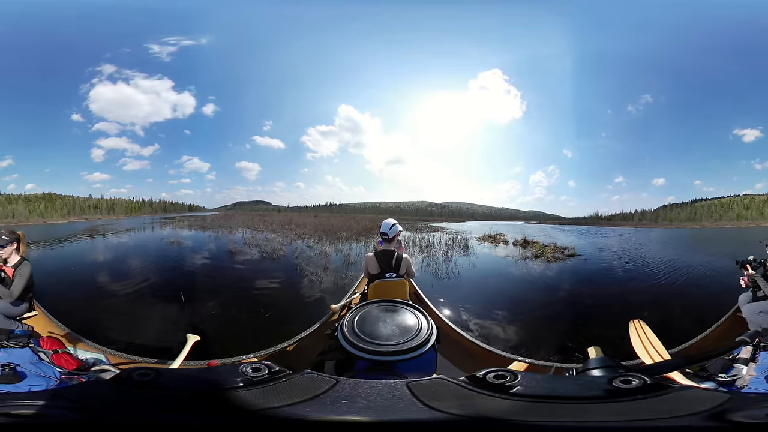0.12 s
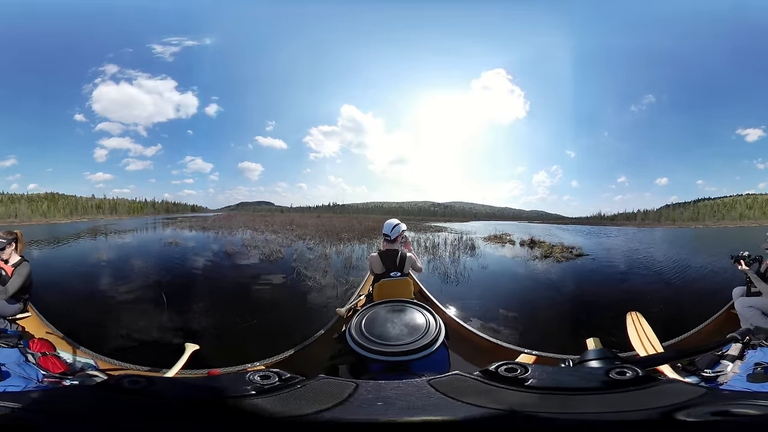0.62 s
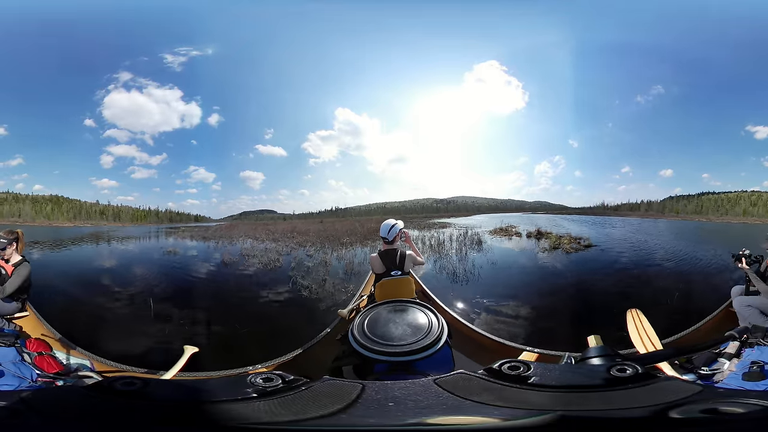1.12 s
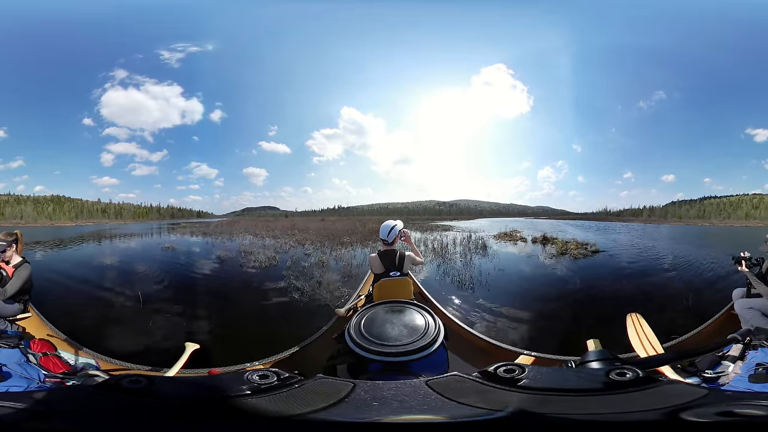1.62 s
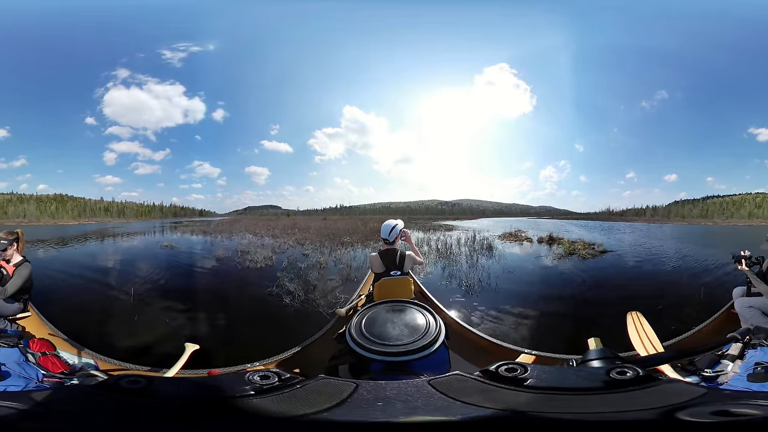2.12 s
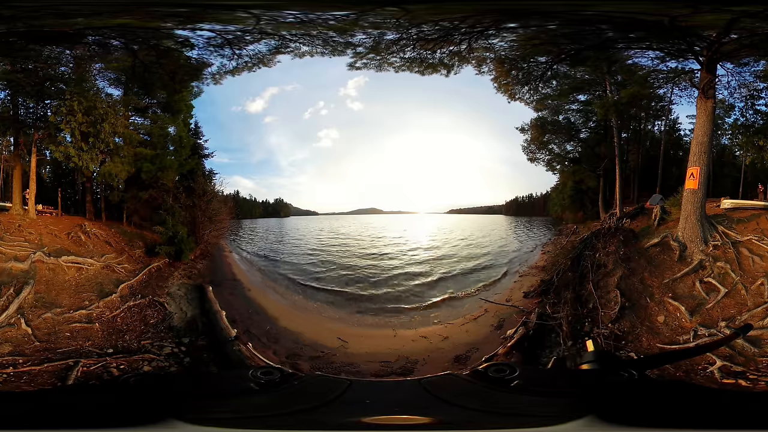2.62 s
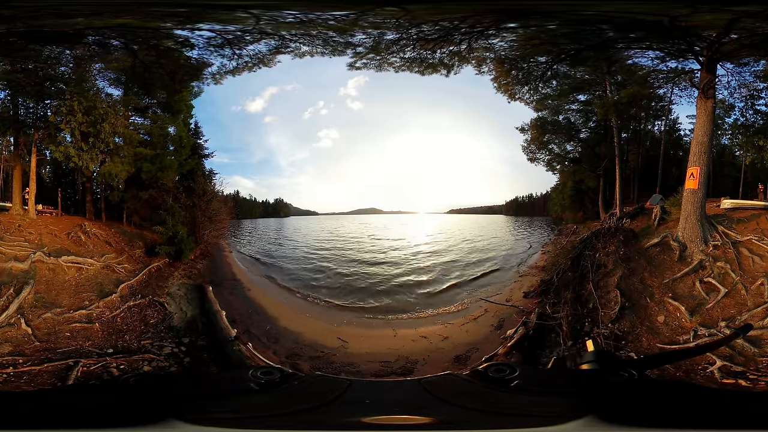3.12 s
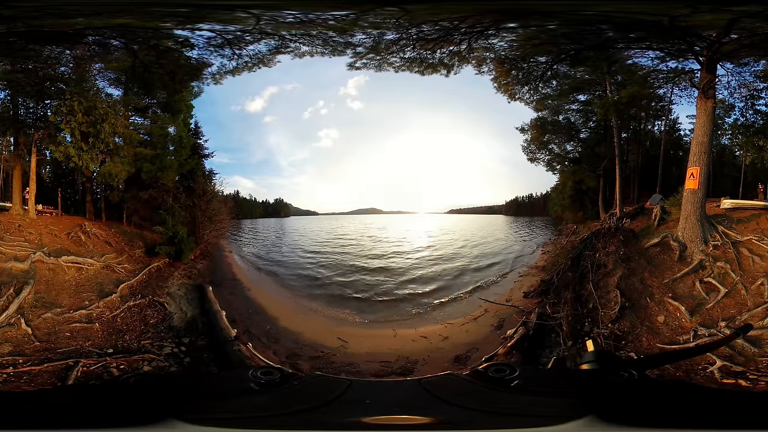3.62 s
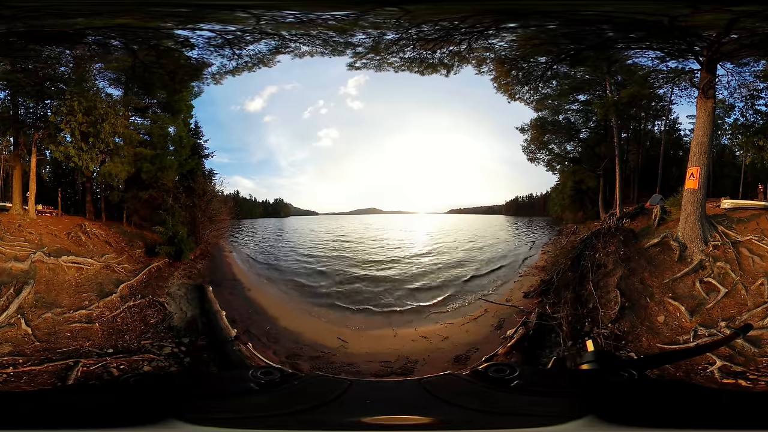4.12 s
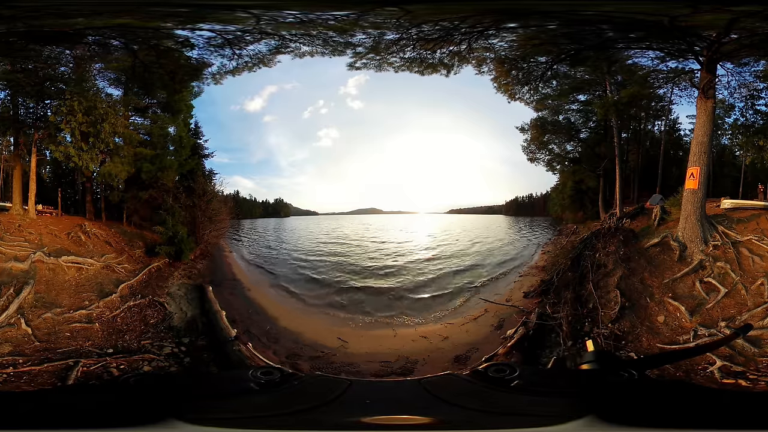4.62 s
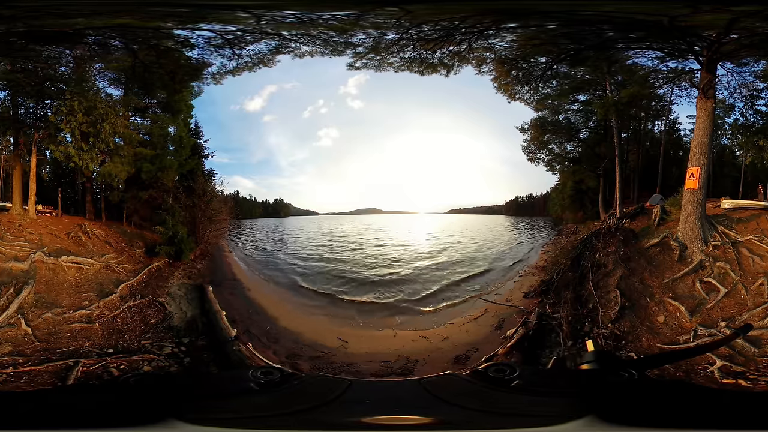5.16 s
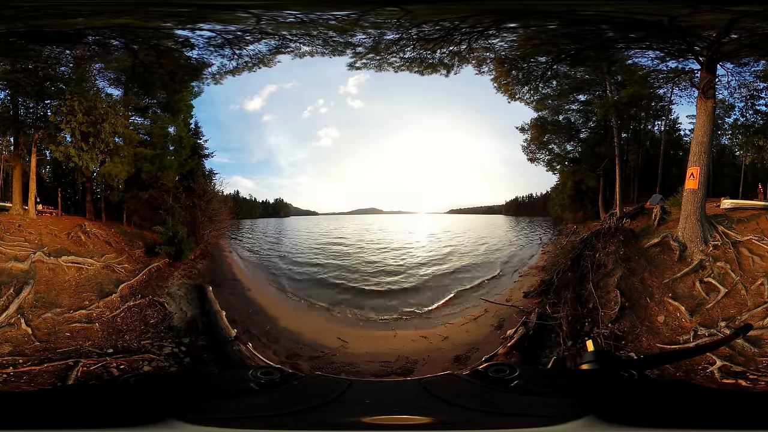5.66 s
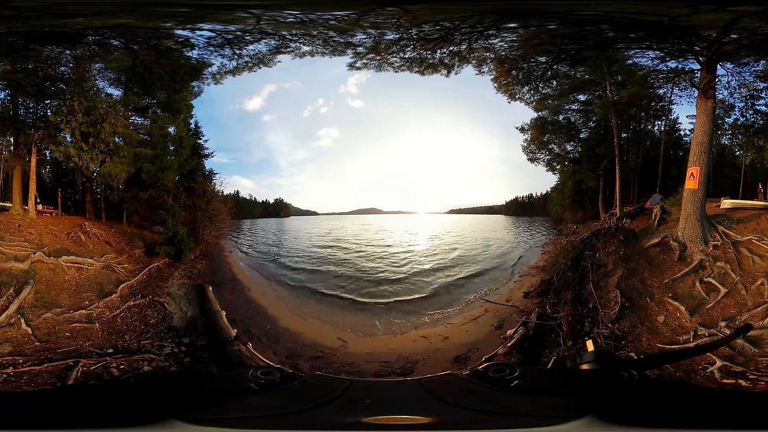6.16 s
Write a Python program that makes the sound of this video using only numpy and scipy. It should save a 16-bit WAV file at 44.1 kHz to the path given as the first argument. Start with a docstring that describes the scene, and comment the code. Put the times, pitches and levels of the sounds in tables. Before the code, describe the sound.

Lumpy wind buffets the microphone with dull thuds over faint rippling water, then abruptly small waves lap, gurgle and fizz on a sandy shore.

```python
"""First a boat on open water: gusts buffet each of two microphone ports as lumpy low noise with single dull thuds,
the lake rustles and swishes in flickering noise bands, and gear ticks on the hull as struck modes.
Then the place changes at once to a shore: wavelets fold to left and right, trapped bubbles sing as gliding decaying
sines, foam fizzes in tiny ringing pops and short snaps, crests slap, and the wash swells and drains as coloured noise."""
import sys
import numpy as np
from scipy import signal
from scipy.fft import rfft, irfft, next_fast_len
from scipy.io import wavfile

SR = 44100
rng = np.random.default_rng(int(sys.argv[2]) if len(sys.argv) > 2 else 0)


def ratio_of_db(decibels):
    """Turn decibels (scalar or array-like) into linear amplitude factors; 0 dB maps to 1."""
    return 10 ** (np.asarray(decibels, float) / 20)


def store_wav(level_fs):
    """Save 16-bit WAV to argv[1]."""
    pcm = np.round(np.clip(np.atleast_2d(level_fs), -1, 1) * 32767)
    wavfile.write(sys.argv[1], SR, pcm.T.astype(np.int16))


N = 276507

CHANGE_S = 2.4907   # boat before, shore after
PORT_LAG_MS = 0.21   # the farther port hears this much later
# where along the beach the water folds: (time [s], lag of the left port [ms])
FOLDING_SIDE = [(2.5, .04), (2.62, -0.1), (2.9, -.15), (3.05, 0.033), (3.3, 0.057), (3.45, -0.13),
                (4.2, -0.23), (4.4, 0.056), (4.6, -0.28), (4.87, -0.083), (4.96, 0.23), (5.25, 0.15),
                (5.5, -0.014), (5.8, -0.034), (6.05, -0.12), (6.27, -0.029)]


def in_time(rows):
    """Linear interpolation: the columns of a time table, sample by sample."""
    s, *columns = np.transpose(rows)
    return [np.interp(np.arange(N) / SR, s, c) for c in columns]


def at_hz(points, hz):
    """Pitch is logarithmic: a table is read on a log-frequency axis."""
    return np.interp(np.log(hz), np.log(np.array(points)[:, 0]), np.array(points)[:, 1])


def rms_one(x):
    """Normalisation to unit mean power."""
    return x / np.sqrt(np.mean(x ** 2) + 1e-20)


def band(x, low_hz, high_hz):
    """Butterworth band-pass: flat within the band."""
    sos = signal.butter(2, [low_hz, min(high_hz, .45 * SR)], "band", fs=SR, output="sos")
    return signal.sosfilt(sos, x)


def split(x, centres):
    """Zero-phase filter bank: overlapping triangles in log frequency that add up to one."""
    size = next_fast_len(x.shape[-1])
    spectrum = rfft(x, size)
    log_hz = np.log(np.arange(size // 2 + 1) * SR / size + 1e-3)
    for k in range(len(centres)):
        weight = np.interp(log_hz, np.log(centres), np.arange(len(centres)) == k)
        yield irfft(spectrum * weight, size)[..., :x.shape[-1]]


def drift(rate_hz):
    """Low-passed noise of rms 1: a double pole lets through changes up to about rate_hz."""
    r = np.exp(-80 * np.pi * rate_hz / SR)   # one value per 40 samples
    slow = signal.lfilter([1], [1, -2 * r, r * r], rng.standard_normal(N // 40 + 2002))[2000:]
    return np.interp(np.arange(N) / 40, np.arange(len(slow)), rms_one(slow))


def grains(per_s, spread_db):
    """Poisson-like impulses of either sign with a long tail of sizes."""
    sizes = ratio_of_db(spread_db * np.minimum(rng.exponential(1, N), 5)) * rng.choice([-1, 1], N)
    return sizes * (rng.random(N) < per_s / SR) + 1e-18


def ring(clicks, hz, t60_s):
    """Damped resonator: a unit click sets off a sine that falls 60 dB in t60_s."""
    r, w = ratio_of_db(-60 / (t60_s * SR)), 2 * np.pi * hz / SR
    return signal.lfilter([0, np.sin(w)], [1, -2 * r * np.cos(w), r * r], clicks + 1e-18)


def add(out, s, burst, peak_db, pan_db):
    """Arrival-time and level differences: a short burst reaches the nearer port first and stronger."""
    burst = burst / abs(burst).max() * ratio_of_db(peak_db + np.array([[.5], [-.5]]) * pan_db)
    for side in (0, 1):
        farther = (pan_db < 0) != side
        i = round(s * SR + farther * PORT_LAG_MS * SR / 1000)
        out[side, i:i + 240] += burst[side, :max(N - i, 0)]


def wind(sign):
    """Turbulent pressure pushes a port membrane in lumps; sign is 1 for the left port, -1 for the right."""
    # gust: (time [s], drive, 6 dB below the summed power of both ports [dB], left re right [dB],
    # flutter drive, scaled by flutter_share [dB])
    gust = [(0.0, -43, -13, -12.5), (0.31, -28, -6, -16), (0.39, -35.5, -24, -11), (0.47, -33.5, -9, -8),
            (0.6, -28, -20, -14.5), (0.67, -38, -9.5, -10), (0.93, -31, -8, -13), (0.98, -28, -3, -17),
            (1.09, -34.5, -9.5, -9.5), (1.19, -36.5, 11.5, -10.5), (1.23, -29, -16, -12),
            (1.39, -19.5, 10, -23), (1.41, -29.5, -1.5, -13.5), (1.84, -37, 14, -16), (1.95, -34, 0, -19.5),
            (2.2, -35.5, 11.5, -9.5), (2.24, -36.5, -1.5, -10), (2.49, -38, 5.5, -5)]
    # eddy spectrum: (frequency [Hz], relative density [dB per Hz])
    eddy = [(20, 4), (40, 1.5), (90, -2), (160, 0), (300, -10.5), (600, -34), (1200, -55.5)]
    # (frequency [Hz], share of the lump dB [ratio])
    lump_share = [(30, -0.67), (100, 1.3), (300, 1.2), (700, 0.7)]
    # (frequency [Hz], share of the flutter dB [ratio])
    flutter_share = [(100, 1), (170, 2.1), (300, 2.5), (700, 2.7)]
    # single strong eddies: (time [s], peak at the louder port [dB], left re right [dB], top frequency [Hz])
    thumps = [(0.317, -22, -29, 267), (0.367, -11, -46, 269), (0.482, -9.5, -43, 253),
              (0.505, -20, -39, 274), (0.522, -14, -39, 261), (0.545, -22, -35, 236),
              (0.572, -21, -30.5, 236), (0.6, -22.5, -22, 196), (0.764, -25.5, -28, 254),
              (0.81, -22.5, -15, 190), (0.852, -29.5, -16, 198), (0.906, -24.5, -20, 260),
              (0.953, -18.5, -2, 99), (1.01, -23.5, 11, 90), (1.231, -18, -11, 170), (1.255, -20, -16, 275),
              (1.268, -17.5, -9, 119), (1.318, -15, -6, 149), (1.342, -22, 28, 295), (1.404, -26, -6, 177),
              (1.445, -26, -17, 276), (1.549, -22.5, 26, 270), (1.894, -36.5, 1, 195),
              (2.115, -29, 23, 275), (2.293, -33, 6, 218), (2.42, -26, -3, 238)]
    decay_cycles, rise_cycles = 1.67, 1.23   # of the top frequency

    cut = round(CHANGE_S * SR)
    rumble_db, pan_db, flutter_db = in_time(gust)
    lumps_db = 2.34 * drift(31.4)[:cut]
    pushes = rms_one(rng.standard_normal(N) + grains(300, spread_db=4.0) * 5.6)[:cut]
    centres, out = 16 * 2 ** np.arange(0, 6.6, .5), np.zeros(N)
    for hz, part in list(zip(centres, split(pushes, centres)))[1:-1]:
        flutter = at_hz(flutter_share, hz) * flutter_db[:cut]
        lumps = at_hz(lump_share, hz) * lumps_db
        out[:cut] += part * ratio_of_db(at_hz(eddy, hz) + flutter + lumps)
    out[:cut] = rms_one(out[:cut])
    out *= ratio_of_db(rumble_db) * 2 / np.sqrt(1 + ratio_of_db(-2 * sign * pan_db))

    steps = np.arange(3000)
    for s, peak_db, pan_db, top_hz in thumps:
        u = steps / SR * top_hz   # a slower eddy lasts longer
        noise = rng.standard_normal(6000)
        for order in (2, 3):   # steep above the top, so an eddy is a dull thud
            low_pass = signal.butter(order, top_hz * (order - 1), fs=SR, output="sos")
            noise = signal.sosfilt(low_pass, noise)
        rise = np.sin(np.minimum(u / rise_cycles, 1) * np.pi / 2) ** 2
        thud = band(noise, 38, 1900)[3000:] * np.exp(-u / decay_cycles) * rise
        i = round(s * SR)
        out[i:i + 3000] += thud / abs(thud).max() * ratio_of_db(peak_db + min(sign * pan_db, 0))
    return out


def sing(rows):
    """Bubble resonance: a fast swell, a pitch glide and a decay, reaching one port a little before the other."""
    s, peak_db, first_hz, last_hz, length_ms, lag_ms = np.transpose(rows)[..., None]
    out = np.zeros((2, N + 4000))
    steps = np.arange(min(int(length_ms.max() * SR / 350), 3000))
    length = np.clip(length_ms, .3, 40) / 1000
    start = np.clip(np.round((s - .5 * length) * SR), 0, N).astype(int)
    phase = rng.uniform(0, 2 * np.pi, s.shape)
    for side, sign in enumerate((1, -1)):
        t = np.maximum(steps / SR - (0.24 + sign * lag_ms / 2) / 1000, 0)
        u = t / length
        shape = np.tanh(5.9 * u) * np.exp(.3 - 1.22 * u ** 0.91)
        turns = first_hz * t + (last_hz - first_hz) * t * u / 2.03
        np.add.at(out[side], start + steps, ratio_of_db(peak_db) * shape * np.sin(2 * np.pi * turns + phase))
    # high-pass at 170 Hz: keeps the abrupt bubble onsets from thumping in the bass
    return band(out[:, :N], 170, 16000)


def with_offspring(rows, count=3):
    """Fragmentation: a big bubble breaks up, and smaller, mostly higher and weaker ones follow it."""
    young = np.repeat(np.array(rows, float), count, axis=0)
    normal = rng.standard_normal((len(young), 3))
    young[:, 0] += young[:, 4] / 1000 * (0.2005 + 0.78 * abs(normal[:, 0]))
    young[:, 1] += -12.0 + 2 * normal[:, 1]
    young[:, 2:4] *= 2 ** (0.33 + 0.397 * normal[:, 2:])
    young[:, 4] *= .45
    return np.vstack([rows, young])


def big_bubbles():
    """Localisation by delay: the clear bubbles and their offspring come from where the water folds."""
    # (time half a length after onset [s], strength before the envelope [dB], first pitch [Hz],
    # last pitch [Hz], length [ms])
    clear_bubbles = [(2.516, -46.5, 1910, 1640, 3.2), (2.6, -39, 340, 472, 16.4),
                     (2.619, -33.5, 546, 610, 12.4), (2.635, -37, 880, 990, 8), (2.689, -42, 1080, 1130, 8),
                     (2.804, -42, 636, 715, 8.3), (2.874, -39, 2100, 2130, 4), (2.973, -39, 724, 860, 10),
                     (2.98, -35, 377, 401.5, 36), (3.005, -46, 1110, 1230, 20),
                     (3.195, -40, 2060, 2100, 4.1), (3.28, -40, 660, 550, 12), (3.438, -45, 206, 244, 34),
                     (3.47, -44.5, 247, 306, 27), (3.521, -44, 447, 581, 62), (3.587, -40, 400, 443, 40),
                     (3.591, -47, 191, 212, 27), (3.61, -31, 742, 723, 19.3), (3.715, -33, 1460, 1360, 3.4),
                     (3.742, -39, 1500, 1410, 4), (3.939, -37, 1570, 1780, 4.2),
                     (4.125, -46.5, 550, 750, 19), (4.207, -35, 1040, 1000, 4.3),
                     (4.247, -51, 334, 288, 23), (4.391, -40, 1020, 1120, 6.3), (4.399, -52, 370, 380, 23),
                     (4.419, -42, 584, 690, 13), (4.448, -45.5, 794, 890, 14.3), (4.633, -49, 275, 330, 30),
                     (4.617, -25.5, 1036, 900, 8.1), (4.642, -37, 930, 1190, 8), (4.669, -43, 340, 343, 22),
                     (4.741, -33, 2200, 2200, 2.4), (4.864, -40, 1700, 1800, 3.5),
                     (4.78, -45, 306, 235, 20.5), (4.961, -47, 532, 578, 23.5),
                     (4.975, -39.5, 1090, 1000, 8.8), (5.135, -41, 1510, 1410, 5.5),
                     (5.22, -40.5, 2380, 2360, 3), (5.352, -39.5, 865, 940, 15.3),
                     (5.384, -41.5, 339, 545, 34), (5.415, -42, 700, 750, 10.6),
                     (5.446, -39.5, 890, 950, 8), (5.684, -45, 597, 534, 16), (5.686, -44, 376, 348, 20),
                     (5.724, -39, 1040, 1210, 8), (5.738, -45, 246, 329, 28), (5.82, -42, 1260, 1330, 4.6),
                     (5.836, -39, 795, 980, 7.6), (5.873, -40.5, 1950, 1880, 11),
                     (5.875, -39, 1040, 1114, 9.9), (5.926, -45, 394, 438, 20), (5.982, -41, 427, 340, 18),
                     (6.043, -33.5, 1120, 1270, 11), (6.206, -44, 1250, 1600, 7.7),
                     (6.242, -42, 810, 995, 10)]
    rows = with_offspring(clear_bubbles)
    lag_ms = np.interp(rows[:, 0], *np.transpose(FOLDING_SIDE))
    return sing(np.column_stack([rows, lag_ms]))


def small_bubbles(gurgle_db, deep_db, count=3400):
    """Superposed resonances: crowds of lesser bubbles, thicker where a wavelet folds, from left or right."""
    draw, normal = rng.random((count, 3)), rng.standard_normal((count, 3))
    crowd = ratio_of_db(.5 * gurgle_db + 5.0 * drift(16.0)) * (np.arange(N) > CHANGE_S * SR)
    at = np.searchsorted(np.cumsum(crowd) / crowd.sum(), draw[:, 0]).clip(0, N - 1)
    hz = 950 * 2 ** (0.854 * normal[:, 0])
    level_db = np.where(hz < 650, deep_db[at] - 0.5, gurgle_db[at] - 2.0)
    high_loss_db = 5.2 * np.maximum(np.log2(hz / 1900), 0)
    low_loss_db = 6.0 * np.maximum(np.log2(330 / hz), 0)
    peak_db = level_db + 2.56 * normal[:, 1] - high_loss_db - low_loss_db
    cycles = np.minimum(2.546 + 8.84 * draw[:, 1] ** 2, hz / 60)
    # one patch of beach at a time
    side = np.sign(drift(11.0)[at] + 1.1 * (draw[:, 2] - .5) + 5.2 * in_time(FOLDING_SIDE)[0][at])
    lag_ms = PORT_LAG_MS * side + 0.075 * normal[:, 2]
    last_hz = hz * (1 + 0.15 * draw[:, 1])
    return sing(np.transpose([at / SR, peak_db, hz, last_hz, 1000 * cycles / hz, lag_ms]))


def spatter_db():
    """Shot noise with exponential decay: spray lands in sudden handfuls that lift the fizz and fade."""
    per_s, lift_db, fade_s = 9.0, 4.5, 0.024   # lift_db is the largest single lift
    r = np.exp(-1 / (fade_s * SR))
    handfuls = (rng.random(N) < per_s / SR) * rng.random(N)
    lifts = signal.lfilter([1], [1, -r], handfuls + 1e-18)
    return lift_db * (lifts - lifts.mean())


def fizz(fizz_db, count=90):
    """Impulsive film rupture: foam is a dense spray of ringing ticks; larger films snap as short noise bursts."""
    # the loudest films: (time [s], peak averaged in dB over the ports [dB], pitch [Hz], left re right [dB])
    loud_snaps = [(3.2485, -43, 11900, -7.0), (3.5475, -43, 6600, 5), (3.5934, -43, 5630, 17),
                  (3.6364, -32, 12100, -3.5), (4.2918, -45.5, 12100, -1.0), (4.509, -44, 11600, -11),
                  (4.852, -37.5, 10400, 8), (5.0307, -47, 5000, -13), (5.411, -46, 6750, -15),
                  (5.8273, -39, 6100, 1), (5.979, -36.5, 10700, 10), (6.156, -48, 11800, 15.5)]
    out = np.zeros((2, N))
    for hz in np.geomspace(2800, 12000, 6):
        pops = ring(grains(500, spread_db=2.6), hz, 6.0 / hz + .0006) * ratio_of_db(fizz_db - 6.0)
        lag = rng.integers(1, 9)   # samples
        out += np.array([pops, np.roll(pops, lag)])[::rng.choice([-1, 1])]
    draw = rng.random((count, 4))
    when = CHANGE_S + draw[:, 0] * (N / SR - CHANGE_S)
    level_db = fizz_db[(when * SR).astype(int)] + 18.5 - 21.0 * draw[:, 1]
    lesser = np.transpose([when, level_db, 3500 * 3.3 ** draw[:, 2], 27.0 * (draw[:, 3] - .5)])
    for s, peak_db, hz, pan_db in np.vstack([loud_snaps, lesser]):
        burst = rng.standard_normal(240) * np.exp(-np.arange(240) / 52.0)
        burst[0] = 1.04   # a sharp front, then spray
        add(out, s, band(burst, hz * 0.81, hz * 1.32), peak_db, pan_db)
    return out


def slaps():
    """Impact impulse: a crest hits flat, a single sharp pressure swing made by band-passing a click twice."""
    # (time [s], peak averaged in dB over the ports [dB], left re right [dB])
    crests = [(2.7155, -33, 4), (3.0685, -30, 0.), (3.1663, -25, 0.), (5.7, -33, -9), (5.932, -35, 8)]
    low_hz, high_hz = 550, 2400
    out = np.zeros((2, N))
    crack = band(band(np.arange(240) == 0, low_hz, high_hz), low_hz, high_hz)
    for s, peak_db, pan_db in crests:
        add(out, s, crack, peak_db, pan_db)
    return out


def ticks():
    """Modal excitation: gear knocks the hull with a rattling contact, each knock with its own mix of modes."""
    # (time [s], relative strength [dB])
    knocks = [(0.285, -44), (0.336, -47), (0.4526, -50), (0.477, -48.5), (1.165, -37)]
    # (frequency [Hz], relative strength [dB], 60 dB decay time [s])
    hull_modes = [(1800, -3, .012), (2300, -1, .012), (2900, -2, .006), (3600, -3, .004), (4600, -3, .004),
                  (5700, -2, .004), (6900, -4, .003), (8400, -4, .003), (11000, -5, .003)]
    out, at = 0, [round(s * SR) for s, db in knocks]
    for hz, level_db, t60_s in hull_modes:
        clicks = np.zeros(N)
        clicks[at] = ratio_of_db(np.array(knocks)[:, 1] + level_db - 11.0 + 2 * rng.standard_normal(len(at)))
        rattle = np.exp(-np.arange(300) / 103.0) * rng.standard_normal(300) * 0.49
        rattle[0] = 1
        out = out + ring(np.convolve(clicks, rattle)[:N], hz, t60_s)
    return band(out, 1350, 11000)


def hiss(colour, likeness, low_db, mid_db, treble_db, patchy_db, span):
    """Partly coherent stereo noise: bands flicker after their register's level, but bass keeps a mean level."""
    white = rng.standard_normal((2, N))[:, span]
    size = next_fast_len(white.shape[1])
    hz = np.arange(size // 2 + 1) * SR / size + 1
    mid, side = rfft(white, size) * ratio_of_db(at_hz(colour, hz))
    alike = np.clip(at_hz(likeness, hz), -.99, .99)
    pair = np.sqrt(1 + alike) * mid + np.sqrt(1 - alike) * side * [[1], [-1]]
    pair = irfft(pair, size)[:, :white.shape[1]]
    out, together = 0, drift(25)[span]
    centres = 120 * 2 ** np.arange(0, 7.1, .5)
    for centre, part in zip(centres, split(pair, centres)):
        register_db = (low_db if centre < 650 else mid_db if centre < 2600 else treble_db)[span]
        if centre < 200:
            register_db = np.mean(register_db)
        depth_db = patchy_db * min(1, 3000 / centre) ** .5
        flicker_db = depth_db * (0.72 * together + drift(23.6)[span])
        out = out + part * ratio_of_db(register_db + flicker_db)
    return out


def wash(gurgle_db, deep_db, fizz_db):
    """Coloured noise: the shore's wash swells and drains with the surge in three registers."""
    # (frequency [Hz], relative density [dB per Hz])
    shore_colour = [(20, -8), (60, -11.5), (140, -18), (210, -9.5), (260, -16), (450, -12), (900, -1),
                    (2000, -2.5), (2800, -11), (4000, -15.5), (7000, -19.5), (9000, -24.5), (12500, -24),
                    (13600, -31), (15700, -27)]
    # (frequency [Hz], left-right correlation [-1 to 1])
    shore_alike = [(60, 0.13), (110, 0.57), (200, 0.76), (380, 0.98), (700, 0.98), (1290, 0.66),
                   (2380, -0.6), (4400, -0.39), (8120, 0.23), (15000, -0.15)]
    span = slice(round(CHANGE_S * SR), N)
    return hiss(shore_colour, shore_alike, deep_db + 19.5, gurgle_db + 10.5, fizz_db + 22.0, 1.82, span)


def lake():
    """Coloured noise: ripples merge into a hiss that rustles early on and swishes near 2.3 s."""
    # (time [s], ripple hiss, relative [dB], treble, relative [dB])
    ripples = [(0.0, -63, -68.5), (0.1, -60.5, -66.5), (0.22, -64, -70.5), (0.32, -61, -66),
               (0.42, -63.5, -70), (0.5, -60.5, -67), (0.62, -64.5, -71), (1.0, -65, -72),
               (2.1, -63.5, -73), (2.24, -63, -70.5), (2.31, -55.5, -71.5), (2.48, -59.5, -70.5)]
    # (frequency [Hz], relative density [dB per Hz])
    lake_colour = [(300, -4.5), (500, -4.5), (900, -6), (1800, -8), (3600, -14.5), (9000, -20.5),
                   (12500, -22), (13600, -27), (15700, -23.5)]
    # (frequency [Hz], left-right correlation [-1 to 1])
    lake_alike = [(60, 0.05), (180, 0.34), (550, 0.95), (1650, 0.59), (4970, 0.12), (15000, -0.17)]
    ripple_db, treble_db = in_time(ripples)
    span = slice(0, round(CHANGE_S * SR))
    return hiss(lake_colour, lake_alike, ripple_db + 16.5, ripple_db + 18.0, treble_db + 23.5, 0.97, span)


def scene():
    """Superposition: the sources of each place add up, boat before the change and shore after it."""
    # wash swelling and draining: (time [s], gurgle, relative [dB], deep gurgle, relative [dB],
    # fizz, relative [dB])
    surge = [(2.49, -49, -49, -58), (2.64, -51, -52, -60), (2.8, -52.5, -55.5, -59.5),
             (2.95, -51.5, -53.5, -59.5), (3.07, -52, -58, -62.5), (3.27, -50, -54.5, -56.5),
             (3.45, -53, -56, -62.5), (3.62, -46.5, -48.5, -56), (3.77, -50.5, -49, -57.5),
             (3.92, -52.5, -58, -60.5), (4.12, -58, -58.5, -67), (4.3, -59, -60, -63),
             (4.43, -54, -57.5, -62), (4.57, -57.5, -61, -67.5), (4.66, -53, -54, -59.5),
             (4.81, -52, -51, -62), (5.0, -53.5, -60, -62.5), (5.28, -57, -58, -65.5),
             (5.42, -51.5, -53, -62), (5.58, -53.5, -60.5, -60.5), (5.71, -49, -50.5, -58.5),
             (5.79, -52, -52, -60), (5.88, -47, -52, -58), (6.01, -48.5, -56.5, -61),
             (6.14, -54, -59.5, -64), (6.27, -51, -57, -61)]
    cut = round(CHANGE_S * SR)
    boat = np.array([wind(1), wind(-1)]) + ticks()
    boat[:, :cut] += lake()
    gurgle_db, deep_db, fizz_db = in_time(surge)
    fizz_db = fizz_db + spatter_db()
    shore = big_bubbles() + small_bubbles(gurgle_db, deep_db) + fizz(fizz_db) + slaps()
    shore[:, cut:] += wash(gurgle_db, deep_db, fizz_db)
    return np.where(np.arange(N) < cut, boat, shore)


def band_limit(x):
    """A steep low-pass at the top of the band."""
    return signal.sosfilt(signal.butter(12, 16510, fs=SR, output="sos"), x)


def record(dry):
    """Cavity resonance: the port lifts the high treble; an elliptic low-pass cuts the top."""
    # (frequency [Hz], width [Hz], lift [dB])
    port_resonance = (12200, 1700, 7.0)
    hz, width_hz, lift_db = port_resonance
    r = np.exp(-np.pi * width_hz / SR)
    poles = [1, -2 * r * np.cos(2 * np.pi * hz / SR), r * r]
    peak = signal.lfilter(np.array([1, 0, -1]) * (1 - r * r) / 2, poles, dry)
    heard = dry + (ratio_of_db(lift_db) - 1) * peak
    low_pass = signal.ellip(10, .5, 45, 15830, fs=SR, output="sos")   # ripple dB, stop dB, cutoff Hz
    heard = signal.sosfilt(low_pass, heard)
    return band_limit(heard)


dry = scene()
out = record(dry)
store_wav(out)
```